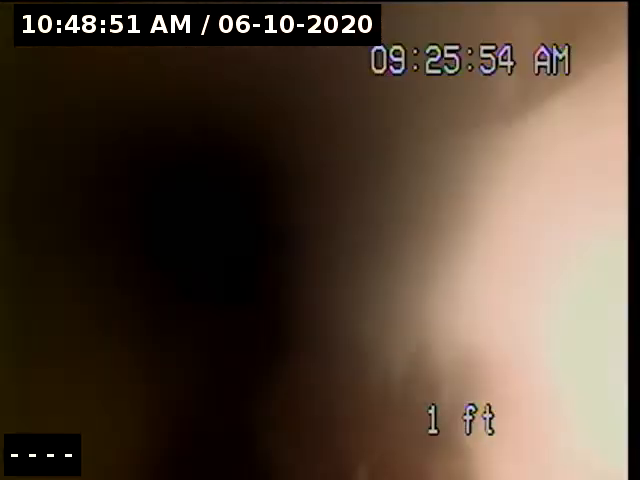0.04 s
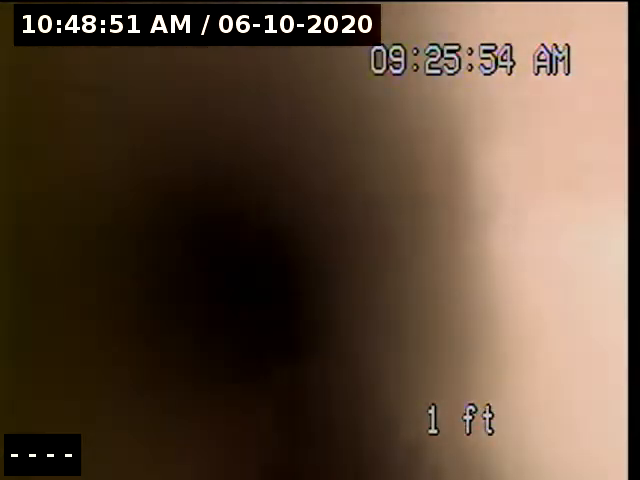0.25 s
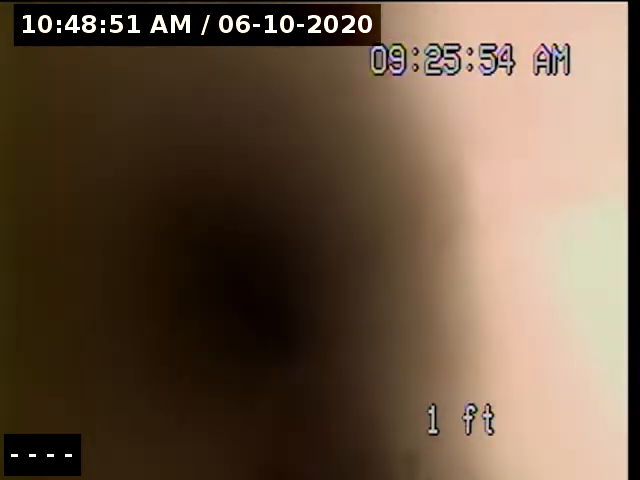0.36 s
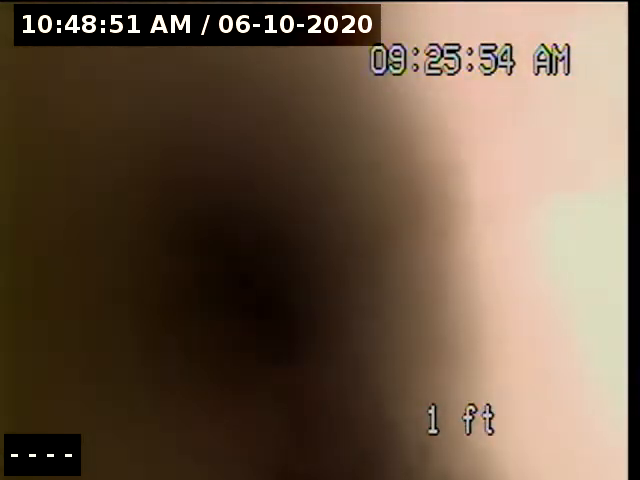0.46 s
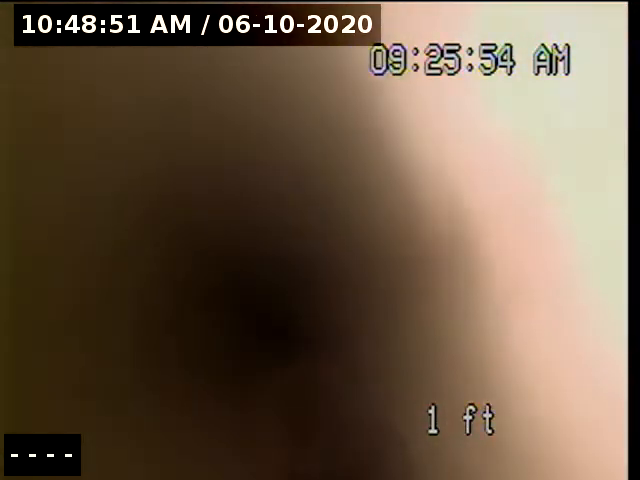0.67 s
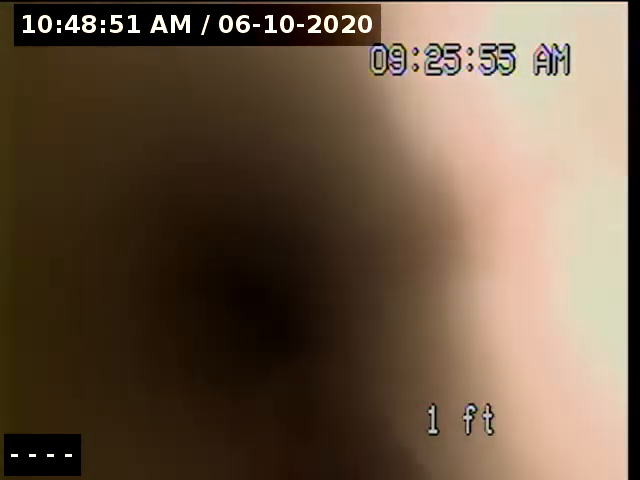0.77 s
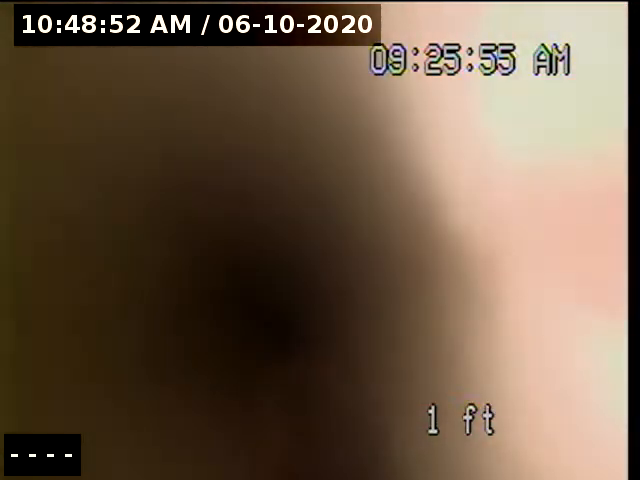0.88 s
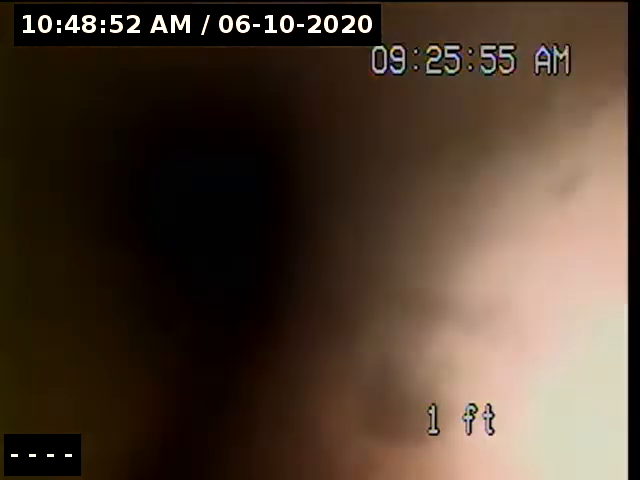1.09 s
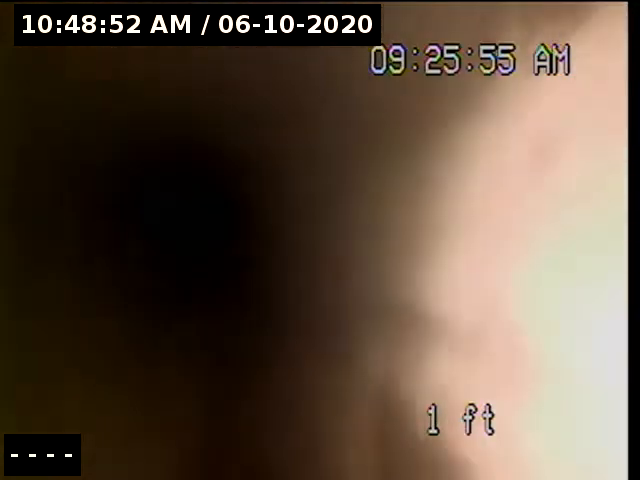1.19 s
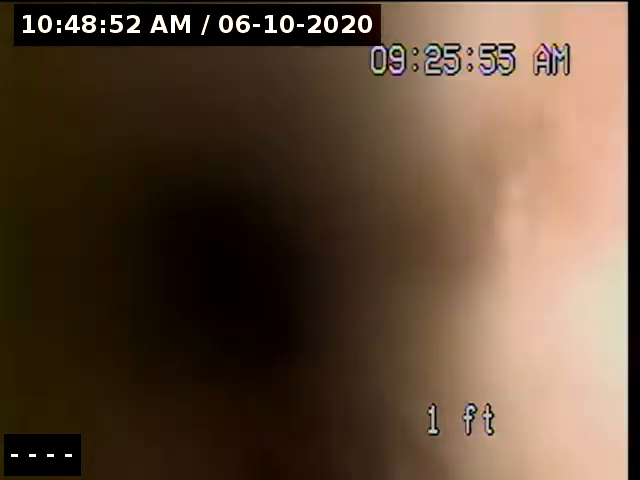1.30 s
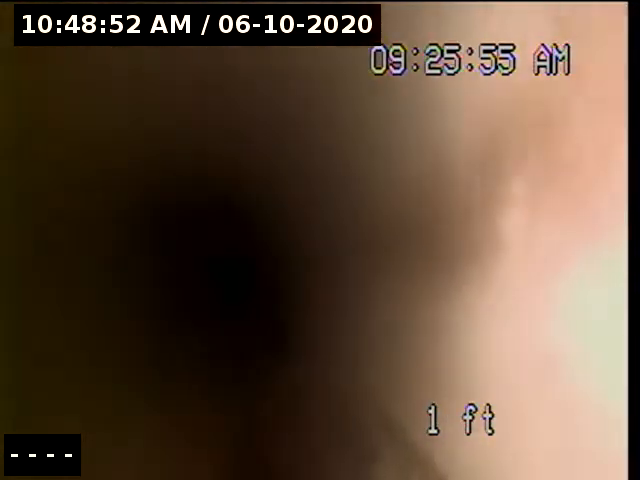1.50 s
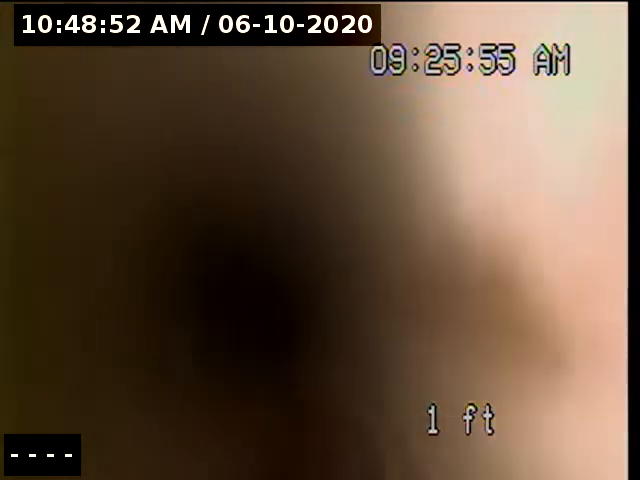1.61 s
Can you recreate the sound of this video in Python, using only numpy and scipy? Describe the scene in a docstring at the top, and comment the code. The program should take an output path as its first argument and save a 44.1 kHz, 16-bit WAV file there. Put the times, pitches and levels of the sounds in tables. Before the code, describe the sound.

Knocks on a hollow plastic inspection camera, very close and distorted. Hiss and a low uneven hum run throughout. A hard boomy thump hits at 0.2 s, with small rattles and rubbing after it; a brighter, longer clatter bursts at 0.42-0.5 s. Light ticks from 0.76 s lead to a medium knock at 0.91 s, then faint taps and scuffs until about 1.4 s, with a thin high whine strongest after 1 s.

```python
"""Outdoors, right beside a small built-in microphone, inspection gear is knocked and dragged.
Each knock is decaying noise and a pitched ring in the casing, plus a push that booms a hollow near 215 Hz.
Rubbing, made of dense grains, and a steady hiss with an uneven hum fill the gaps; faint tones whine.
The cheap input stage overloads lopsidedly, loses the bass and has a hole at 4 kHz."""
import sys
import numpy as np
from scipy import signal
from scipy.fft import rfft, irfft, next_fast_len
from scipy.io import wavfile
from scipy.ndimage import uniform_filter1d

SR = 44100
rng = np.random.default_rng(int(sys.argv[2]) if len(sys.argv) > 2 else 0)


def boost(x):
    """Linear amplitude factor 10**(x/20) for a level x in decibels (scalar or array-like)."""
    u = np.asarray(x, float) / 20
    return 10 ** u


def pcm_store(signal):
    """Save signal as 16-bit PCM."""
    levels = np.round(np.clip(np.atleast_2d(signal), -1, 1) * 32767)
    wavfile.write(sys.argv[1], SR, levels.astype(np.int16).T)


N = 72765  # length in samples

# Spectral shape of the steady hiss: f/Hz, relative level/dB per Hz
HISS_SHAPE = [(18, -67.5), (30, -31.5), (140, -10.5), (175, -57.5), (197, 4), (272, -10.5), (406, -12),
              (618, -4.5), (834, 3), (1170, -6.5), (1380, -6.5), (3130, -25), (3600, -25.5), (4680, -54.5),
              (7920, -120)]
# Faint electric tones, before their fade and wander: f/Hz, level/dB
WHINE_TONES = [(6078, -62), (7144, -49.5), (7989, -63)]
# Slow fade shared by the tones: t/s, level change/dB
WHINE_FADE = [(0, -4.5), (.9, -5.5), (1.05, 3.5), (1.42, 7.5), (1.55, -9), (1.65, -9)]
# Rubbing of hands and cable, strength of the grains: t/s, level/dB
RUB_LEVEL = [(0, -29), (.15, -32.5), (.2, -40), (.3, -22), (.4, -18), (.52, -42.5), (.6, -26.5),
             (.72, -32.5), (.78, -24), (.88, -25), (1.0, -23.5), (1.08, -25.5), (1.2, -27), (1.32, -29),
             (1.45, -31.5), (1.65, -41)]
# Resonances of the casing: f/Hz, width/Hz, relative level/dB
CASING_MODES = [(389, 104, 3), (651, 120, 5), (900, 655, 0), (1160, 233, 4.5), (1400.5, 88, 1.5),
                (1807, 133, -4.5), (2315, 900, -16)]
# Ringing modes of the hollow: f/Hz, relative level/dB, t60/s
HOLLOW_MODES = [(214.3, -2, 0.098), (227, -8, 0.068), (343, -18, 0.039), (410, -17.5, 0.22)]
# Knocks on the gear: t/s, rattle envelope level/dB, rattle t60/s, rattle pitch f/Hz,
# boom push level/dB, starting treble level/dB relative to the rattle envelope
KNOCKS = [(.2000, 15.5, 0.066, 642.2, -10.5, -4), (.207, 1.5, 0.054, 648, 12.5, -6.5),
          (0.215, -8, 0.035, 900, -9.5, -5.5), (0.25, -9.5, .08, 726, -21.5, -34),
          (0.262, -14.5, 0.089, 740, -25.5, -30), (.322, -26, 0.074, 900, -12.5, -32),
          (0.342, -7, 0.039, 733, -16, -35), (0.35, -14, 0.05, 768, -25, -35),
          (.379, -10, 0.027, 900, -23, -31), (0.393, -5, 0.039, 813, -21, -35),
          (0.405, -8, 0.082, 1012, -38.5, -24.5), (.416, 13.5, .08, 1153, 13, 2),
          (.430, 3.5, 0.093, 900, 7.5, 2.5), (0.446, 7, 0.076, 1077, 9, -6.5),
          (0.456, 6, 0.088, 1271, 0.5, -3), (.474, 4, 0.048, 900, 1, -14.5),
          (.481, -6.5, .06, 708, 6.5, -21), (.505, -19, 0.43, 1168, -32, -33.5),
          (.764, -17, 0.066, 1080, -29, -15.5), (.776, -15, 0.045, 410, -20.5, -28.5),
          (.794, -11.5, .05, 1150, -30, -19), (0.824, -26, 0.041, 835, -18, -18),
          (0.856, -14, 0.053, 1417, -14, -22), (.872, -9.5, 0.048, 1710, -21, -32),
          (.887, -10, 0.035, 900, -4, -29), (0.907, 6.5, 0.073, 1063, -5, -8.5),
          (.917, 0.5, 0.018, 1082, 4, -20), (.937, -21.5, 0.098, 900, -6.5, -11),
          (0.977, -9.5, 0.047, 1251, -22, -21.5), (1.052, -31.5, 0.21, 792, -18, -13),
          (1.082, -26.5, 0.21, 1094, -18.5, -23), (1.127, -16, 0.079, 442, -23, -25),
          (1.138, -14.5, 0.053, 997, -17.5, -36), (1.15, -19.5, 0.075, 1650, -24.5, -43),
          (1.212, -12, 0.13, 619.6, -11.5, -41), (1.289, -22.5, 0.16, 338, -16.5, -44),
          (1.309, -26, 0.15, 1357, -13, -33), (1.37, -32.5, 0.2, 1400, -18, -35)]
# Response of the input stage, with its hole at 4 kHz: f/Hz, level/dB
INPUT_RESPONSE = [(20, -1), (2000, 0), (3000, -4.5), (3600, -15), (3850, -25.5), (4000, -57.5), (4200, -23),
                  (4500, -17.5), (5500, -10.5), (7000, -12), (8000, -17.5), (8800, -36.5), (9300, -63),
                  (22050, -89)]


def colour(x, table):
    """Filter by level points joined along log frequency."""
    hz, db = np.array(table, float).T
    n = next_fast_len(N + 4096)
    f = np.maximum(np.arange(n // 2 + 1) * SR / n, 1)
    gain = boost(np.interp(np.log(f), np.log(hz), db))
    return irfft(rfft(x, n) * gain, n)[:N]


def unit(x):
    """Scale to rms 1."""
    return x / np.sqrt(np.mean(x ** 2))


def level_curve(t, table):
    """Gain that follows a table of times and levels."""
    return boost(np.interp(t, *np.array(table).T))


def walk(rate_hz):
    """Slow random wander, spread near 1: random steps smoothed twice."""
    k = int(SR / rate_hz)
    steps = np.repeat(rng.standard_normal(N // k + 1), k)
    return 1.5 * uniform_filter1d(uniform_filter1d(steps, k), k)[:N]


def reson(x, hz, width_hz):
    """Resonant band-pass, gain 1 at the centre."""
    return signal.lfilter(*signal.iirpeak(hz, hz / width_hz, SR), x)


def treble(x):
    """The bright band of a contact: two equal resonances in series."""
    hz, width_hz = 5740, 4000
    return 2 * reson(reson(x, hz, width_hz), hz, width_hz)


def hollow(x):
    """Air in the hollow: decaying modes struck by x, each a one-pole complex resonator."""
    out = 0
    for hz, db, t60 in HOLLOW_MODES:
        pole = np.exp(2j * np.pi * hz / SR - np.log(1000) / (t60 * SR))
        out = out + boost(db) * signal.lfilter([1], [1, -pole], x).imag
    return out


def casing(x, white):
    """Noise through the casing resonances, scaled so white noise comes out at rms 1."""
    def body(v):
        out = 0
        for k, (hz, width_hz, db) in enumerate(CASING_MODES):
            out = out + (-1) ** k * boost(db) * reson(v, hz, width_hz)  # neighbours in opposite phase
        return out
    return body(x) / np.std(body(white))


def background():
    """Steady shaped hiss, and noise that keeps the hollow humming unevenly."""
    hiss = unit(colour(rng.standard_normal(N), HISS_SHAPE)) * boost(-27 + 0.4 * walk(16))
    hum = unit(hollow(rng.standard_normal(N))) * boost(-31 - 3.5 * walk(19))
    bright_hiss = boost(-60) * treble(rng.standard_normal(N))
    return hiss + hum + bright_hiss


def whines(t):
    """Faint electric tones: sines that fade together and wander separately in level."""
    fade = level_curve(t, WHINE_FADE)
    out = 0
    for hz, db in WHINE_TONES:
        out = out + fade * boost(db + 4.3 * walk(6)) * np.sin(2 * np.pi * hz * t)
    return out


def rub(t, white):
    """Dense uneven grains of random sign scrape the casing."""
    grains_per_s, spread_db, treble_db = 750, 1, -52
    on = rng.random(N) < grains_per_s / SR
    strength = boost(spread_db * rng.exponential(1, N))
    grains = unit(on * np.sign(white) * strength) * level_curve(t, RUB_LEVEL)
    return casing(grains, white) + boost(treble_db) * treble(grains)


def knocks(t, white):
    """Each blow rattles and rings the casing, thuds, and pushes the hollow into booming."""
    attack_s, push_s = 0.00075, 0.00227
    pitched_q, clean_ring_db = 7.3, -4.5
    treble_faster = 1.2  # the treble decays this many times as fast as the rattle
    rattle_power, bright_power, push, pitched = np.zeros((4, N))
    for s, db, t60, hz, boom_db, treble_db in KNOCKS:
        u = np.maximum(t - s, 0)  # time since the blow
        env = boost(db) * (1 - np.exp(-u / attack_s)) * boost(-60 * u / t60)
        bright_env = env * boost(treble_db - 60 * (treble_faster - 1) * u / t60)
        rattle_power = rattle_power + env ** 2
        bright_power = bright_power + bright_env ** 2
        pitched_noise = unit(reson(white, hz, hz / pitched_q))
        clean_ring = boost(clean_ring_db) * 2 * np.sin(2 * np.pi * hz * u)
        pitched = pitched + env * (pitched_noise + clean_ring)
        pulse = np.sin(np.pi * np.minimum(u / push_s, 1)) ** 2
        push = push + boost(boom_db) * pulse * 2 / (push_s * SR)  # pulse scaled to unit area
    rattle_env, bright_env = np.sqrt(rattle_power), np.sqrt(bright_power)
    rattle = boost(-0.5) * casing(rattle_env * white, white)
    bright = treble(bright_env * white)
    thud = boost(-4) * rattle_env * unit(reson(rng.standard_normal(N), 84, 160))
    boom = hollow(2 * reson(push, 218, 120))
    return rattle + boost(-2) * pitched + bright + boom + thud


def scene():
    """Background, whines, rubbing and knocks summed at the microphone."""
    t = np.arange(N) / SR
    mix = background() + whines(t)
    mix = mix + rub(t, rng.standard_normal(N))
    mix = mix + knocks(t, rng.standard_normal(N))
    return mix[None]


def low_pass(x):
    """Removes everything above the highest recorded frequency."""
    return signal.sosfilt(signal.butter(12, 15800, fs=SR, output="sos"), x)


def high_pass(x, hz):
    """First-order bass loss, as of a coupling capacitor."""
    return signal.lfilter(*signal.butter(1, hz, "high", fs=SR), x)


def record(dry):
    """Microphone input: lopsided overload, coupling capacitor, second stage, colour and ceiling."""
    x = dry[0]
    bent = x + 0.48 * np.clip(x, -0.5, 1) ** 2
    x = high_pass(np.clip(bent, -0.41, 0.67), 130)
    # the second stage bends again and flattens the tops
    bent = high_pass(x + 0.22 * x ** 2, 2.7)
    x = colour(np.clip(bent, -0.7, 0.7), INPUT_RESPONSE)
    ceiling = 0.725  # approached with a slightly rounded knee
    x = x / (1 + np.abs(x / ceiling) ** 40) ** (1 / 40)
    return low_pass(x[None])


dry = scene()
out = record(dry)
pcm_store(out)
```